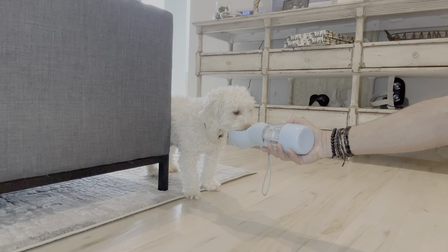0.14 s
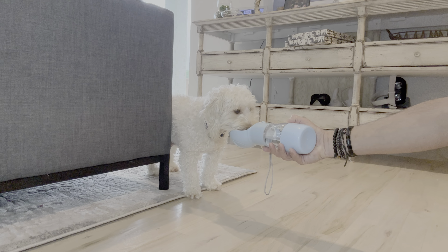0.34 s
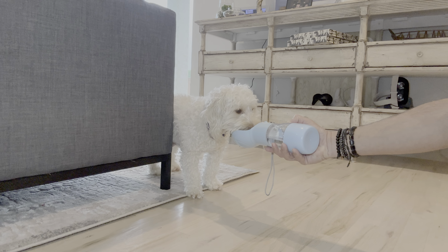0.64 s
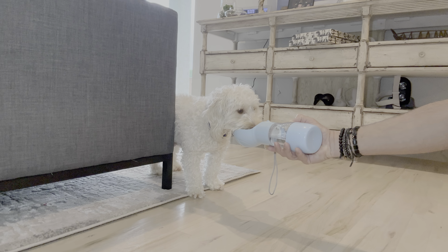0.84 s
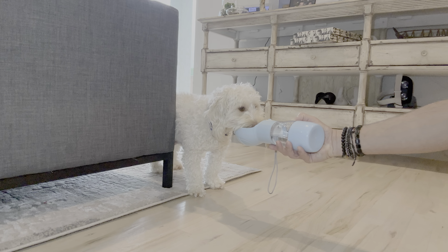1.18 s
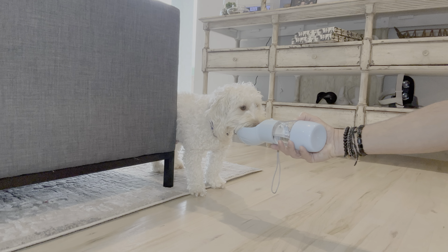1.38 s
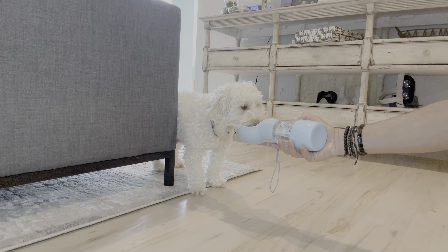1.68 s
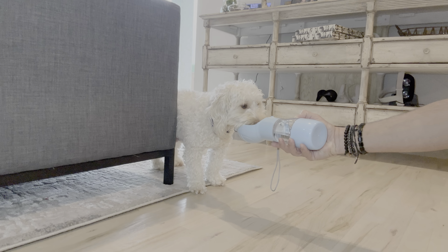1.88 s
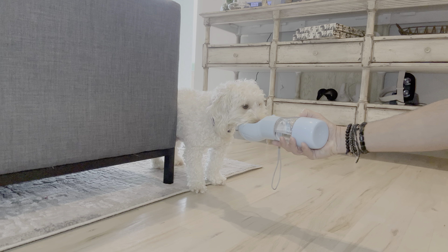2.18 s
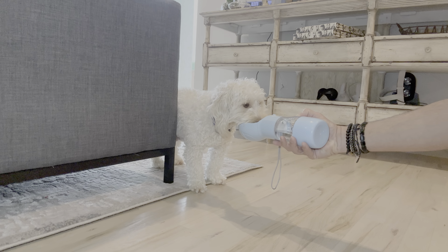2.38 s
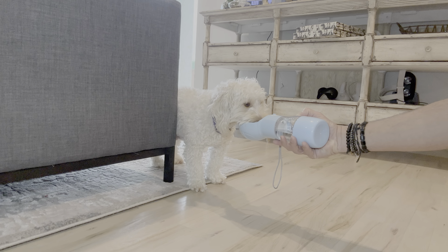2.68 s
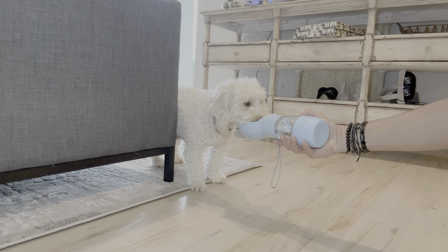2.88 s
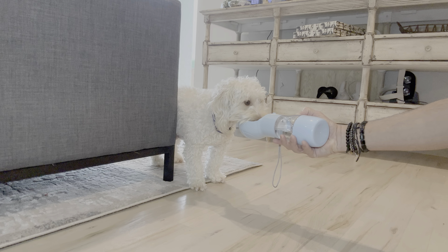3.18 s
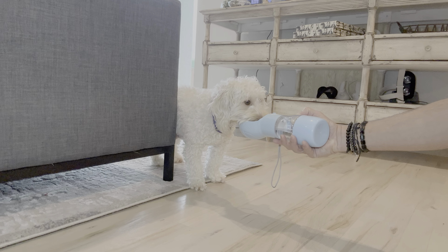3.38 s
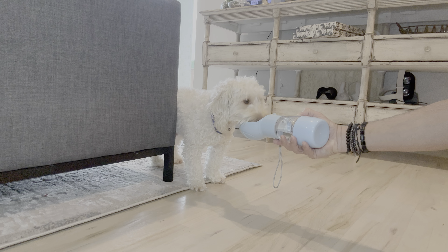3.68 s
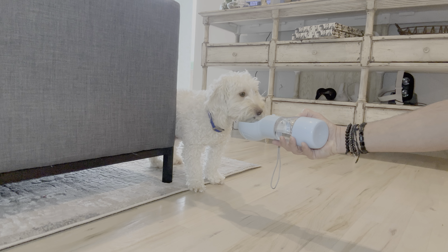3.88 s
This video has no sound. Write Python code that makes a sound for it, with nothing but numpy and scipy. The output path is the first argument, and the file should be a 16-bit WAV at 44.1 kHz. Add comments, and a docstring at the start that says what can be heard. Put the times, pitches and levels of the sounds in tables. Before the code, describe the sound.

Gentle, irregular dog lapping close by indoors, with delicate drips and smacks, a short rising gulp, and a late hollow knock above steady low rumble.

```python
"""In a living room, a small dog laps from a plastic trough, a metre or two from a phone on the floor.
Each lap closes ringing air bubbles and breaks wet films (short coloured noise); crowds of tiny bubbles
follow the tongue's strokes. The dog gulps once, a train of pulses climbing in pitch, then something hollow
knocks and scrapes on the boards: pushes ring decaying modes amid filtered noise.
A low noise rumble and a faint wavering tone fill the room, whose echoes decay at band-dependent rates."""
import sys
import numpy as np
from scipy import signal
from scipy.fft import rfft, irfft
from scipy.io import wavfile
from scipy.ndimage import uniform_filter1d

SR = 44100
rng = np.random.default_rng(int(sys.argv[2]) if len(sys.argv) > 2 else 0)


def bounce(signal):
    """Save signal as a 16-bit WAV file at the path given by the first command-line argument."""
    frames = np.transpose(np.atleast_2d(signal))
    limited = np.clip(frames, -1, 1)
    pcm = np.round(limited * 32767).astype(np.int16)
    wavfile.write(sys.argv[1], SR, pcm)


N = 178228
T = np.arange(N) / SR  # time, s
F = np.arange(N // 2 + 1) * SR / N + 1e-3  # spectrum bins, Hz; the offset keeps the logarithm finite


def undb(db):
    """Level law: amplitude is 10 to the power of dB / 20."""
    return 10 ** (np.asarray(db) / 20)


def on_hz(table, hz):
    """Logarithmic frequency scale: interpolate a table's second column along log frequency."""
    table_hz, values = np.array(table).T
    return np.interp(np.log(hz), np.log(table_hz), values)


def unit(x):
    """Normalisation to an RMS of 1."""
    return x / np.sqrt(np.mean(x ** 2))


def add(out, start_s, x):
    """Superposition: sum a sound into the track from its start time."""
    i = int(start_s * SR)
    out[i:i + len(x)] += x[:N - i]


def walk(rate):
    """Smoothed random modulation: levels held 1 / rate s, then slewed; RMS 1."""
    hold = int(SR / rate)
    steps = np.repeat(rng.standard_normal(N // hold + 1), hold)
    slewed = uniform_filter1d(uniform_filter1d(steps, hold), hold)
    return unit(slewed[:N])


def bubble(hz, cycles, glide=0.077, rise=0.44):
    """Bubble resonance: trapped air swells within about a cycle, decays, and rises in pitch if glide > 0."""
    turns = np.arange(int(7 * cycles * SR / hz)) * hz / SR  # cycles at the starting pitch
    shape = (1 - np.exp(-(turns / rise) ** 2)) * np.exp(-turns / cycles)
    phase = 2 * np.pi * turns * (1 + glide * turns / cycles / 2)
    return shape / shape.max() * np.sin(phase)


def snap(puff, hz, octaves):
    """Film rupture: a millisecond of noise coloured by the pocket that bursts; peak 1."""
    f = np.arange(257) * SR / 512 + 1
    burst = np.roll(puff * np.exp(-np.arange(512) / SR / 0.0013), 32)
    colour = np.exp(-(np.log2(f / hz) / max(octaves, .1)) ** 2)
    tick = irfft(rfft(burst) * colour)
    return tick / np.abs(tick).max()


STROKE_RANGE_DB = 20  # the rise and fade times span this much level


def swell(peak_s, db, rise_s, fade_s):
    """Exponential growth and decay: gain climbs to a peak and dies away, both straight in dB."""
    rising = (peak_s - T) / max(rise_s, .003)
    fading = (T - peak_s) / max(fade_s, .01)
    return undb(db - STROKE_RANGE_DB * np.where(T < peak_s, rising, fading))


# Steady air noise, relative spectral density: hz, gain_db [dB per Hz]
RUMBLE_SPECTRUM = [(20, -42), (33, -38), (40, -4.5), (50, -8), (62, -3), (78, 1.5), (110, -11), (170, -22),
                   (300, -37), (600, -42), (850, -50.5), (1250, -52.5), (2500, -58.5), (5000, -64),
                   (10000, -67), (13000, -65.5), (14800, -60.5), (15600, -73)]
# Left-right coherence of the air noise: hz, correlation [-1 to 1]
RUMBLE_COHERENCE = [(60, 0.91), (130, 1), (290, 0.22), (640, 0.014), (1410, -0.4), (3100, -0.12),
                    (6820, -0.16), (15000, -0.81)]
# Level contour of the faint tone, before its waver: start_s, level_db
TONE_LEVEL = [(0, -96), (.7, -82), (1, -79), (2.8, -76.5), (2.95, -100), (4.04, -79)]
RUMBLE_DB, TONE_HZ = -44.5, 586  # overall RMS level; mean pitch


def rumble():
    """Partial coherence: bass-heavy noise shared between the ears by band, plus a thin tone that wavers."""
    alike = np.clip(on_hz(RUMBLE_COHERENCE, F), -.98, .98)
    mid, side = rfft(rng.standard_normal((2, N))) * undb(on_hz(RUMBLE_SPECTRUM, F))
    shared, opposed = mid * np.sqrt(1 + alike), side * np.sqrt(1 - alike)
    air = irfft(np.array([shared + opposed, shared - opposed]), N)
    tone_gain = undb(np.interp(T, *np.transpose(TONE_LEVEL)) + 1.5 * walk(6))
    tone_phase = 2 * np.pi * np.cumsum(TONE_HZ + 4 * walk(8)) / SR
    return unit(air) * undb(RUMBLE_DB) + tone_gain * np.sin(tone_phase)


# Air pockets closed by the tongue or by droplets falling back:
# start_s, level_db [peak], pitch_hz [at the start], decay_cycles [to 1/e, at least 0.5 when played]
LAP_BUBBLES = [(0.091, -64.5, 1940, 6.5), (0.185, -59.5, 1080, 1.7), (0.233, -53, 1916, 8),
               (0.234, -51, 1300, 1.3), (0.262, -56.5, 1140, 3.6), (0.305, -71, 2070, 8),
               (0.415, -55, 1330, 1.7), (0.451, -55, 1330, 2.7), (0.482, -51.5, 1010, 1.1),
               (0.5395, -59, 1860, 8), (0.54, -50.5, 1080, 0.53), (0.556, -57, 2340, 6.4),
               (0.597, -50, 1470, 0.72), (0.612, -56.5, 2030, 8), (0.741, -51.5, 1300, 4),
               (0.803, -55.5, 1620, 3.2), (0.846, -56.5, 1090, 1.8), (0.846, -60, 1910, 4.9),
               (0.93, -60, 1970, 5.9), (0.9364, -57.5, 2430, 8), (1.069, -60, 1780, 4.8),
               (1.11, -58, 1350, 1.8), (1.174, -49.5, 1300, 2.6), (1.194, -49.5, 1540, 1.9),
               (1.262, -57, 1880, 7.3), (1.483, -66.5, 1880, 14), (1.484, -42, 1372, 3.6),
               (1.782, -55.5, 1150, 1.4), (1.811, -58, 2130, 8.4), (1.845, -64, 1600, 3),
               (1.9, -61, 1830, 3), (1.875, -53, 1180, 0.38), (1.932, -59, 1170, 3.8),
               (2.08, -54, 1314, 4.9), (2.115, -57.5, 1290, 1.9), (2.148, -56.5, 1290, 3.5),
               (2.303, -62, 1590, 6.5), (2.318, -56.5, 2420, 6.8), (2.322, -59, 1190, 8.8),
               (2.48, -51.5, 1300, 3.2), (2.493, -47, 1150, 3.8), (2.607, -57, 1810, 5.4),
               (2.748, -59.5, 2370, 5.3), (2.819, -52, 1350, 2.3), (2.851, -52, 1148, 4.5),
               (2.8528, -57.5, 2110, 7.4), (2.9134, -55, 2740, 7.7), (3.019, -62.5, 1370, 2.1),
               (3.051, -56.5, 1034, 0.87), (3.148, -55, 1380, 2.1), (3.149, -60, 2080, 6.4),
               (3.195, -59, 1760, 3.6), (3.215, -56.5, 2000, 2.6), (3.291, -56.5, 1570, 2.5),
               (3.3205, -47, 2000, 3.9), (3.321, -46, 1380, 2.9), (3.424, -61, 3180, 7.3),
               (3.459, -52.5, 1670, 1.4), (3.459, -44.5, 1024, 1.6), (3.592, -56.5, 1450, 0.84)]


def laps():
    """Bubble resonance: the clearest air pockets and droplets each ring once."""
    out = np.zeros(N)
    for start_s, db, hz, cycles in LAP_BUBBLES:
        add(out, start_s, undb(db) * bubble(hz, max(cycles, .5)))
    return out


# Soft low bumps: start_s, level_db [peak], pitch_hz
LOW_BUMPS = [(0.095, -46.5, 264), (0.187, -56, 460), (1.174, -54.5, 373), (1.847, -56, 402),
             (3.172, -45, 211), (3.815, -37.5, 377), (4.011, -47, 472)]


def bumps():
    """Heavily damped oscillation: short dull bumps of steady pitch."""
    out = np.zeros(N)
    for start_s, db, hz in LOW_BUMPS:
        add(out, start_s, undb(db) * bubble(hz, 2.2, glide=0, rise=.5))
    return out


# Tongue strokes that stir the water: peak_s, level_db, rise_s, fade_s, mouth_pitch_hz,
# spray_level_db, spray_pitch_hz
TONGUE_STROKES = [(.24, -67, 0.015, 0.06, 1290, -69, 2500), (.32, -70.5, 0.035, 0.024, 1415, -82.5, 2160),
                  (.43, -72, 0.022, .08, 1420, -83, 3680), (.52, -64, 0.057, 0.11, 1150, -71.5, 2140),
                  (.6, -71.5, 0.055, 0.067, 1516, -62, 3570), (0.751, -71.5, 0.012, 0.13, 1306, -91, 3680),
                  (0.849, -68, 0.058, 0.12, 1520, -81, 2230), (.96, -75, 0.1, 0.16, 1350, -73.5, 2550),
                  (1.12, -66.5, 0.044, 0.042, 1290, -78, 3630),
                  (1.19, -63.5, 0.017, 0.049, 1430, -77, 2500), (1.268, -71, 0.02, 0.06, 1440, -78, 2400),
                  (1.49, -64, .015, 0.14, 1380, -78.5, 2150), (1.66, -75.5, 0.068, 0.021, 1520, -79, 2290),
                  (1.79, -66.5, 0.037, 0.1, 1167, -72, 3870), (1.88, -71.5, 0.072, 0.14, 1540, -81, 2100),
                  (2.23, -79, .06, .06, 1630, -87, 3820), (2.101, -72, 0.028, 0.21, 1380, -75, 2850),
                  (2.329, -76, 0.025, 0.11, 1300, -70, 2570), (2.501, -60, 0.018, 0.067, 1130, -73.5, 3650),
                  (2.579, -67, 0.066, 0.1, 1404, -74, 2210), (2.83, -64, .14, .1, 1158, -73, 2420),
                  (2.95, -80.5, 0.096, 0.21, 1174, -74, 2830), (3.07, -75, 0.092, 0.19, 1150, -85.5, 2790),
                  (3.2, -66, 0.081, 0.034, 1530, -78.5, 2030), (3.33, -73, 0.037, .05, 1390, -77, 2300),
                  (3.459, -65, 0.075, 0.093, 1213, -76, 2290), (3.6, -81, .05, 0.063, 1130, -85, 2300)]


def stirring():
    """Weighted superposition: strokes sum to stir and spray gains; pitches lean to the strongest stroke."""
    shape = np.array([swell(peak_s, 0, rise, fade) for peak_s, _, rise, fade, *_ in TONGUE_STROKES])
    shape = shape + 1e-12  # keeps the divisions below finite
    db, mouth_hz, spray_db, spray_hz = np.transpose(TONGUE_STROKES)[[1, 4, 5, 6]]
    stir, spray = undb(db) @ shape, undb(spray_db) @ shape
    mouth_pitch = undb(db) * mouth_hz @ shape / stir
    spray_pitch = undb(spray_db) * spray_hz @ shape / spray
    return stir, spray, mouth_pitch, spray_pitch


# Wet films breaking on tongue and lips: start_s, level_db [peak], centre_hz,
# width_octaves [half-width to 1/e, at least 0.1 when played], spit_level_db [peak], spit_centre_hz
FILM_TICKS = [(0.173, -70, 4010, 0.36, -67, 10000), (0.234, -54.5, 4370, 0.31, -51, 9900),
              (0.251, -60, 6340, 0.22, -55, 14000), (0.271, -71, 3890, 0.38, -68, 12500),
              (0.304, -56.5, 6200, 0.1, -65, 12000), (0.4133, -63, 3350, 0.25, -70, 9000),
              (0.544, -56, 7550, .27, -77, 10300), (0.552, -59, 6000, .5, -66, 9500),
              (0.574, -61, 5500, .5, -66, 9500), (0.562, -49, 3800, 0.78, -64, 9400),
              (0.5835, -64, 4200, 0.82, -56, 10300), (0.5958, -54, 3530, 0.6, -54, 10100),
              (0.604, -55, 4600, 0.67, -68, 9430), (0.6117, -55, 5030, 0.56, -73, 13800),
              (0.6213, -50, 3650, 0.8, -75, 10400), (0.707, -58, 6270, .23, -53, 12400),
              (0.7387, -66, 3740, 0.29, -65, 12100), (0.908, -68, 4040, 0.92, -72, 9100),
              (0.9303, -54.5, 3900, 0.64, -57, 8300), (0.9974, -59, 3850, 0.19, -79, 9500),
              (1.0202, -61.5, 6960, 0.15, -61, 13300), (1.107, -56, 3700, .26, -63.5, 9100),
              (1.151, -60, 3460, 0.3, -83, 9490), (1.18, -64, 5950, .25, -83, 9490),
              (1.1974, -58.5, 6200, 0.14, -87, 9490), (1.215, -59.5, 3850, .58, -73, 9070),
              (1.461, -69, 3900, .3, -74, 11100), (1.6278, -58, 3780, 0.25, -72, 11800),
              (1.7752, -50.5, 3980, 0.65, -62, 9930), (1.8736, -63, 6130, .34, -75, 11800),
              (1.932, -64.5, 3600, 0.37, -68, 13600), (2.0475, -54, 8000, 0.3, -66, 14000),
              (2.099, -66.5, 4440, 0.33, -71, 9040), (2.142, -54, 4070, 0.18, -82, 11400),
              (2.321, -55.5, 5860, 0.083, -77, 11700), (2.4564, -68, 5250, 0.35, -63, 9900),
              (2.4815, -57.5, 3680, 0.22, -60.5, 9100), (2.508, -65, 3860, 0.94, -47.5, 11300),
              (2.6062, -55.5, 5700, 0.29, -64, 13400), (2.6128, -52.5, 3200, 0.36, -67, 10100),
              (2.6836, -68, 4170, 0.55, -60, 10600), (2.7564, -64.5, 3490, 0.22, -58, 15100),
              (2.8526, -59, 3100, .3, -62, 7400), (2.83, -59.5, 5930, .2, -76, 11000),
              (2.9126, -59.5, 3280, 0.55, -53.5, 7600), (2.916, -70, 5500, .3, -62, 12400),
              (3.0433, -77, 3200, .4, -52, 15400), (3.1514, -58.5, 3400, 0.56, -50, 11200),
              (3.3178, -52.5, 6670, 0.24, -80, 14100), (3.46, -65, 7000, .3, -80, 12000),
              (3.425, -58, 3990, 0.26, -59, 14600), (3.894, -64, 4250, 0.34, -61, 10300),
              (3.9814, -61, 3520, 0.55, -55, 10200)]
FAINT_TICK_DB, FAINT_TICK_HZ = 7, 4230  # small films: peak over the spray level, usual centre


def ticks(count=130):
    """Impulsive rupture: a snap and a thin spit per film; random faint snaps take the spray's level."""
    out = np.zeros(N)
    puffs = rng.standard_normal((len(FILM_TICKS), 512))
    for (start_s, db, hz, octaves, spit_db, spit_hz), puff in zip(FILM_TICKS, puffs):
        film = undb(db) * snap(puff, hz, octaves)
        spit = undb(spit_db) * snap(puff, spit_hz, 0.45)
        add(out, start_s - 32 / SR, film + spit)  # the burst begins 32 samples into a snap
    spray = stirring()[1]
    for at, puff in zip(rng.random(count), rng.standard_normal((count, 512))):
        hz = FAINT_TICK_HZ * 2 ** (.5 * np.tanh(puff[-1]))
        gain = spray[int(at * N)] * undb(FAINT_TICK_DB)
        add(out, at * N / SR, gain * snap(puff, hz, .4))
    return out


MOUTH_SPREAD, SPRAY_SPREAD = 0.72, 0.47  # full pitch range, octaves


def slosh(count=1400):
    """Bubble-cloud statistics: many tiny rings near the mouth's pitch and in fine spray follow the strokes."""
    mouth_cloud, spray_cloud = np.zeros((2, N))
    stir, spray, mouth_hz, spray_hz = stirring()
    for at, pitch, size, kind in rng.random((count, 4)):
        start_s, i = at * N / SR, int(at * N)
        gain = undb(-4.5 * np.log(size + 0.006))  # a few are far louder than the rest
        if kind < .55:
            hz = mouth_hz[i] * 2 ** (MOUTH_SPREAD * (pitch - .5))
            add(mouth_cloud, start_s, gain * bubble(hz, 4.75))
        else:
            hz = spray_hz[i] * 2 ** (SPRAY_SPREAD * (pitch - .5))
            add(spray_cloud, start_s, gain * bubble(hz, 3.6))
    return stir * unit(mouth_cloud) + spray * unit(spray_cloud)


GULP_S, GULP_DB, GULP_RISE_S, GULP_FADE_S = 3.14, -46, 0.042, 0.13  # time of peak, peak of the gain
GULP_FROM_HZ, GULP_TO_HZ, GULP_CLIMB_S = 263, 606, 0.065  # mean pitch nears its limit exponentially


def gulp():
    """Cavity resonance: uneven throat pulses ring a cavity that shrinks, so the pitch climbs."""
    out, start_s = np.zeros(N), GULP_S - GULP_RISE_S
    gain = swell(GULP_S, GULP_DB, GULP_RISE_S, GULP_FADE_S)
    gaps_s = 0.01 * (0.76 + 1.4 * rng.random(20))
    for pulse_s in start_s + np.cumsum(gaps_s):
        remaining = np.exp(-(pulse_s - start_s) / GULP_CLIMB_S)
        hz = GULP_TO_HZ - (GULP_TO_HZ - GULP_FROM_HZ) * remaining
        rough_hz = hz * 2 ** (0.2 * rng.standard_normal())
        add(out, pulse_s, gain[int(pulse_s * SR)] * bubble(rough_hz, 1.37))
    return out


# Blows on the hollow thing: start_s, strength_db [relative], contact_ms
BLOWS = [(3.6907, -34, 1), (3.6941, -28, 0.88), (3.7, -28, 0.71), (3.74, -47.5, 0.56), (3.751, -46, 0.54)]
# Modes of the hollow thing: pitch_hz, level_db [relative], t60_s
HOLLOW_MODES = [(205.3, 11, 0.12), (405, -0.5, 0.073), (588, -3.5, 0.037), (809, 0, 0.12),
                (1065, -10.5, 0.038), (1166, -2.5, 0.075), (1453, -2.5, 0.025), (2150, -13.5, 0.25)]
# Rough scraping contact, contour before its flutter: start_s, level_db [relative]
SCRAPE_LEVEL = [(3.645, -11), (3.667, -2.5), (3.686, 15.5), (3.697, 20), (3.725, 7.5), (3.744, 14.5),
                (3.768, 2), (3.83, -0.5), (3.95, -22)]
# Colour of the scraping: hz, gain_db
SCRAPE_SPECTRUM = [(200, -62), (500, -38.5), (1200, -50), (1600, -60), (2100, -58.5), (2900, -69),
                   (4000, -64.5), (6000, -66), (8500, -77.5), (11500, -71.5), (15000, -81)]


def knock():
    """Modal excitation: rounded pushes ring damped modes; grainy friction noise surrounds the blows."""
    times_s, levels_db = np.transpose(SCRAPE_LEVEL)
    grit_db = np.interp(T, times_s, levels_db, -99, -99) + 4.8 * walk(400)
    grit = rng.standard_normal(N) * undb(grit_db)
    push, ringing = np.zeros(N), 0
    for start_s, db, contact_ms in BLOWS:
        n = max(int(contact_ms * SR / 1000), 3)
        add(push, start_s, undb(db) * np.hanning(n) / n * 2)
    for k, (hz, db, t60) in enumerate(HOLLOW_MODES):
        pole = np.exp(2j * np.pi * hz / SR - np.log(1000) / (t60 * SR))
        mode = signal.lfilter([1], [1, -pole], push).imag
        ringing = ringing + (-1) ** k * undb(db) * mode  # signs alternate
    scraping = irfft(rfft(grit) * undb(on_hz(SCRAPE_SPECTRUM, F)), N)
    return ringing + scraping


# Decay of the late echoes: hz, t60_s
ROOM_DECAY = [(125, 0.7), (500, 0.68), (1000, 0.9), (4000, 0.28), (12000, 0.42)]
NEAR_ECHO_DB, NEAR_ECHO_S = 9.5, 0.011  # floor and furniture answer first and die quickly
LEFT_LAG_MS = 0.074


def room(x, wet_db):
    """Reverberation: direct sound reaches the left port late; each port hears its own decaying echoes."""
    t = T[:SR // 2 * 2]
    f = np.arange(len(t) // 2 + 1) * SR / len(t) + 1e-3
    echo = np.zeros((2, len(t)))
    for hz in 125 * 2. ** np.arange(8):
        band = np.clip(1 - np.abs(np.log2(f / hz)), 0, 1)
        shared, own = rng.standard_normal(len(t)), rng.standard_normal(echo.shape)
        apart = min(hz / 600, 1)  # long waves reach both ports alike and stir few echoes
        waves = apart ** .5 * ((1 - apart) * shared + apart * own)
        echo += irfft(rfft(waves) * band) * undb(-60 * t / on_hz(ROOM_DECAY, hz))
    echo *= 1 + undb(NEAR_ECHO_DB) * np.exp(-t / NEAR_ECHO_S)
    echo = echo * (t > .003) / np.sqrt(np.sum(echo ** 2) / 2)
    late = irfft(rfft(x) * np.exp(-2j * np.pi * F * LEFT_LAG_MS / 1000), N)
    echoes = signal.fftconvolve(x[None], echo, axes=1)[:, :N]
    return np.array([late, x]) + undb(wet_db) * echoes


def scene():
    """Superposition: each source with its own share of echo, over the steady rumble."""
    water = room(laps() + slosh(), wet_db=-2.5) + room(ticks(), wet_db=2)
    throat = room(gulp() + bumps(), wet_db=0.5)
    return water + throat + room(knock(), wet_db=-2) + rumble()


# Sensitivity of the two ports: hz, left_minus_right_db
PORT_BALANCE = [(60, -1.5), (500, -5), (2000, -2), (5000, -1), (8000, 6), (12000, -2)]
# Resonances of the microphone housing: centre_hz, width_hz [half-width to 1/e], gain_db
HOUSING_MODES = [(1208, 835, 3), (3100, 260, -2.5), (3960, 167, 3.5)]
MONO_HZ, TOP_HZ = 11300, 15750  # left-right difference halves here; upper band edge


def record(dry):
    """Transducer response: ports differ by band, housing resonates, the treble is shared, the top is cut."""
    balance = undb(on_hz(PORT_BALANCE, F) / 2)
    housing = undb(sum(db * np.exp(-((F - hz) / width) ** 2) for hz, width, db in HOUSING_MODES))
    left, right = rfft(dry) * housing * np.array([balance, 1 / balance])
    mid = (left + right) / 2
    side = (left - right) / 2 / (1 + (F / MONO_HZ) ** 8)
    both = irfft(np.array([mid + side, mid - side]), N)
    top_cut = signal.ellip(10, .2, 70, TOP_HZ, fs=SR, output="sos")
    return signal.sosfilt(top_cut, both)


dry = scene()
out = record(dry)
bounce(out)
```